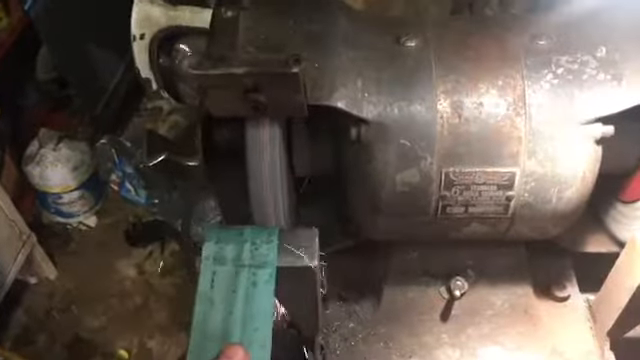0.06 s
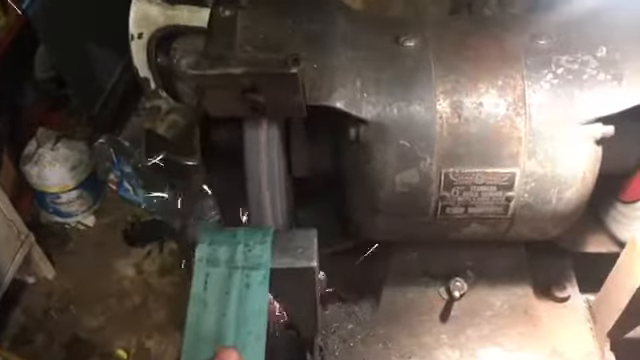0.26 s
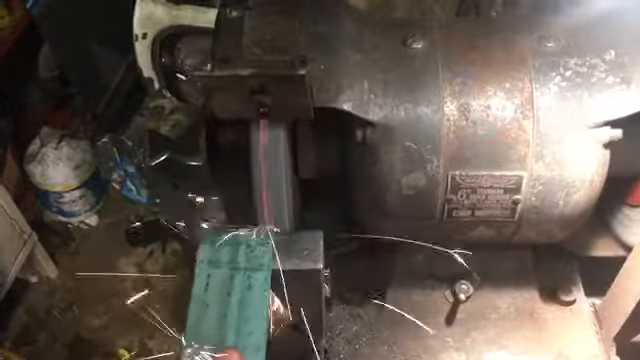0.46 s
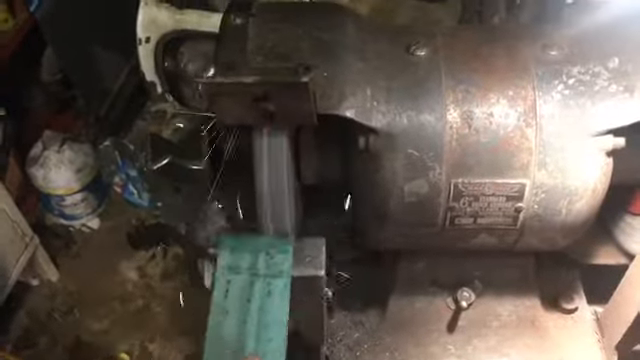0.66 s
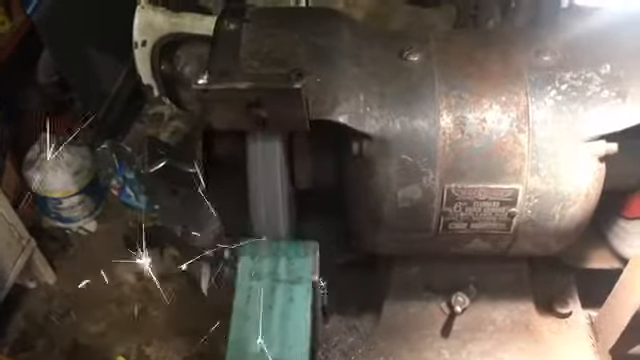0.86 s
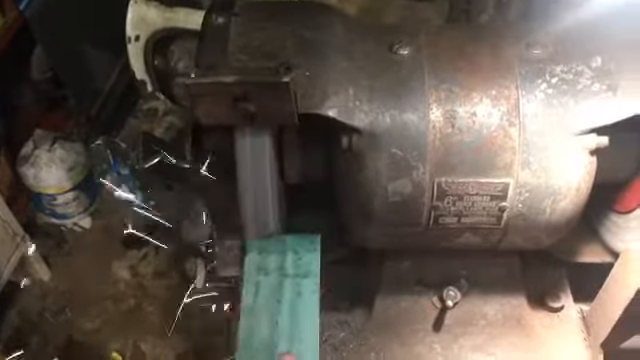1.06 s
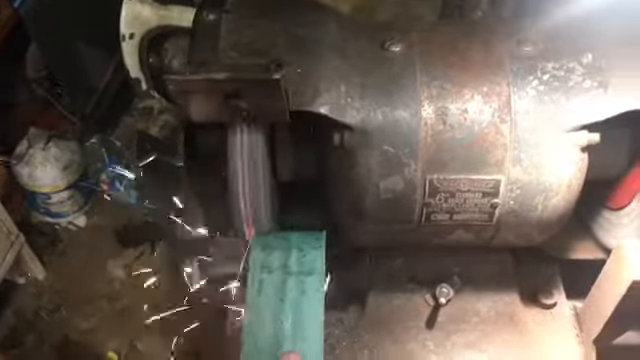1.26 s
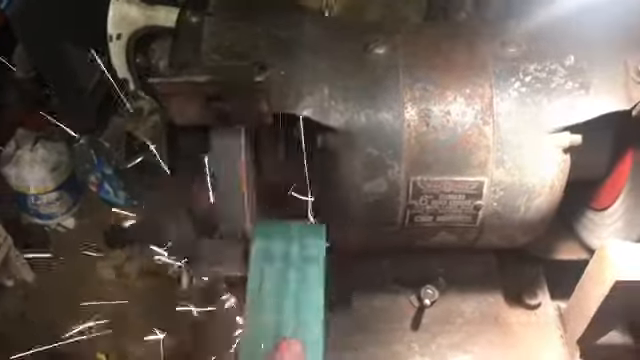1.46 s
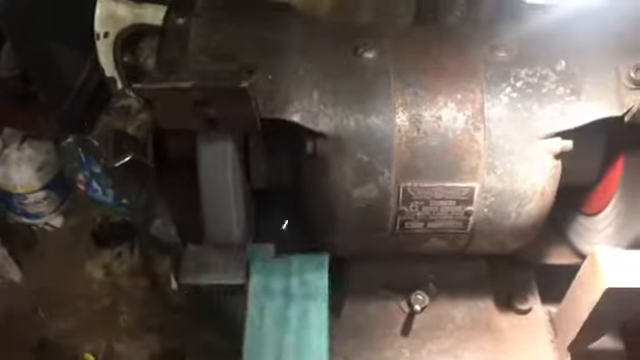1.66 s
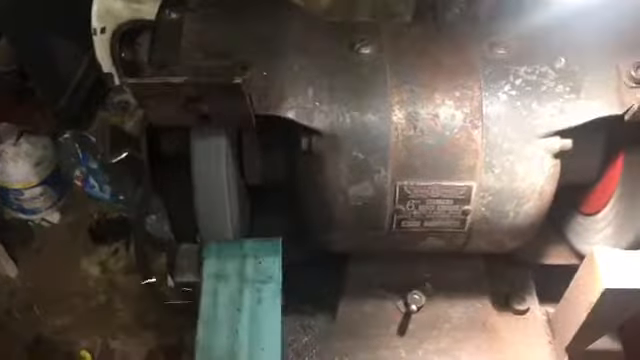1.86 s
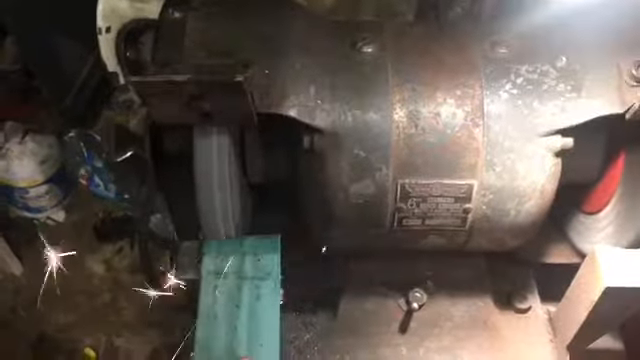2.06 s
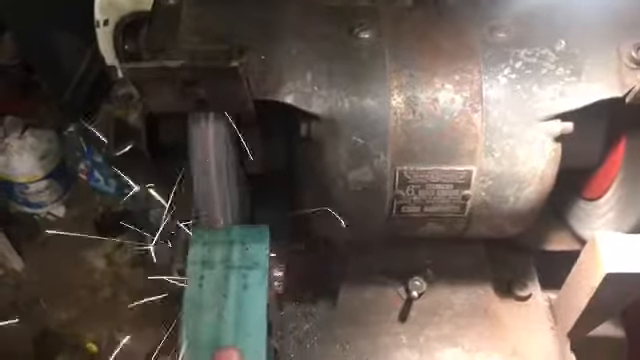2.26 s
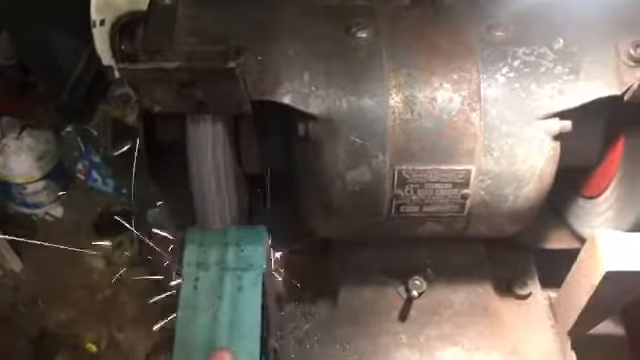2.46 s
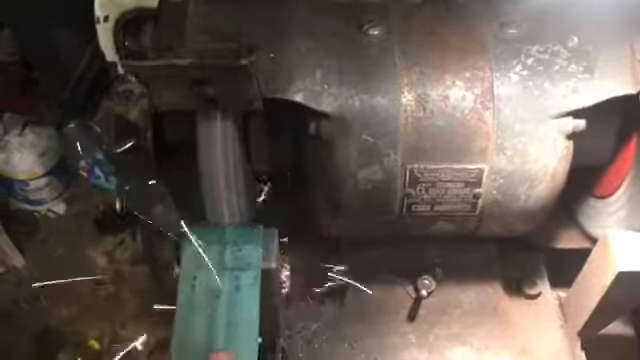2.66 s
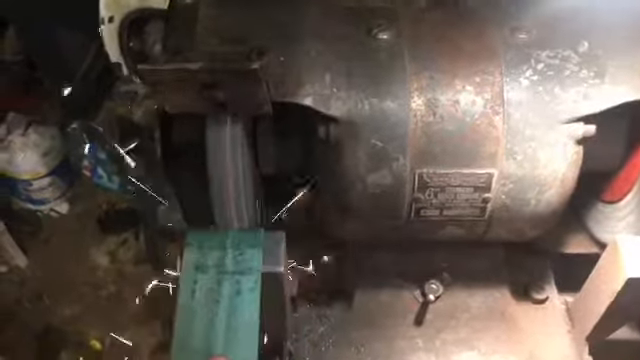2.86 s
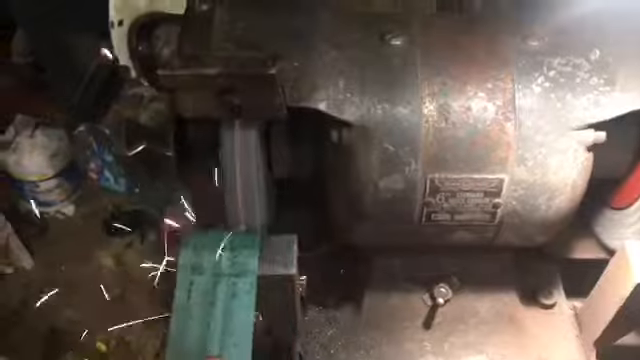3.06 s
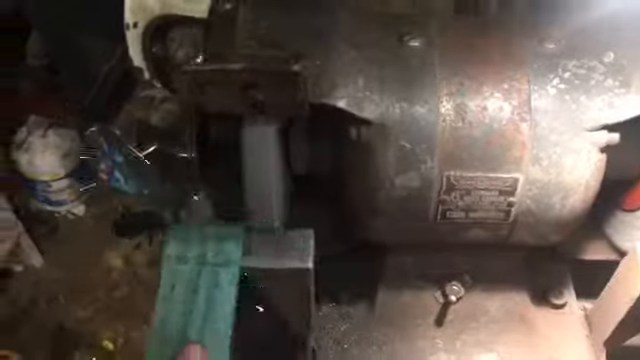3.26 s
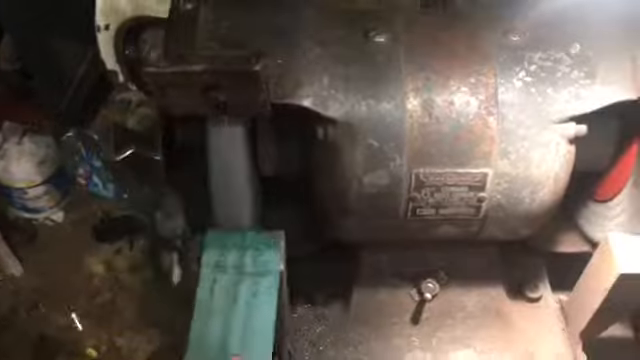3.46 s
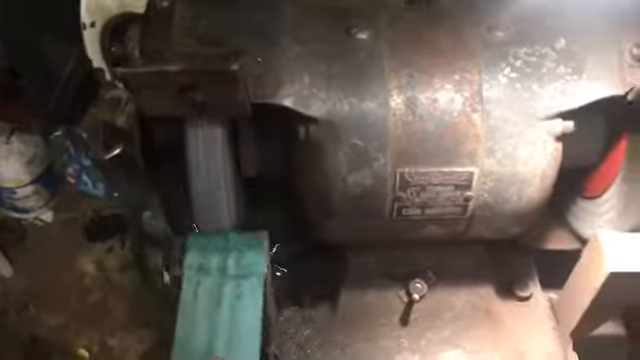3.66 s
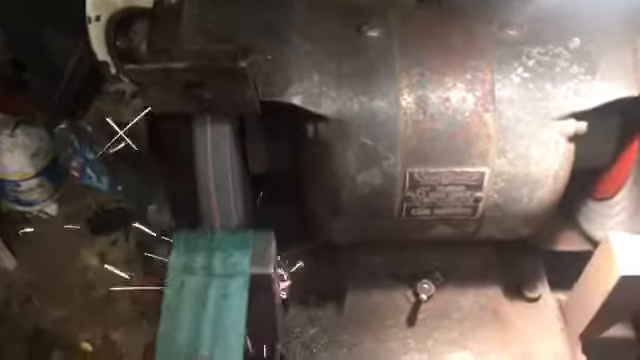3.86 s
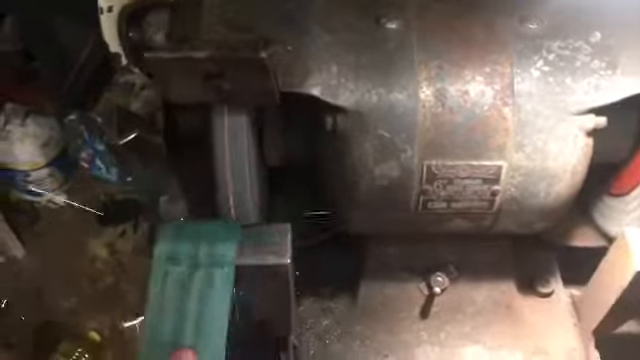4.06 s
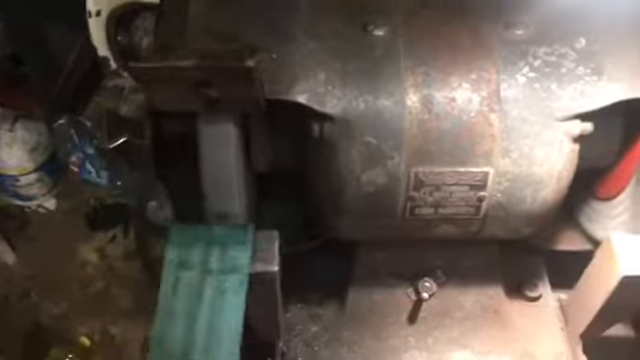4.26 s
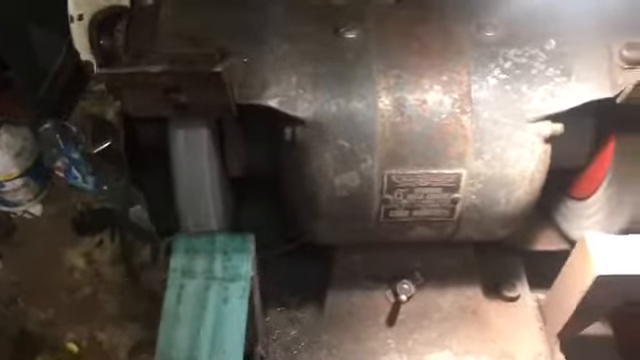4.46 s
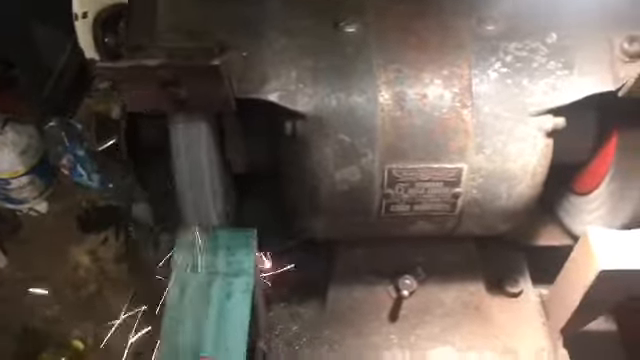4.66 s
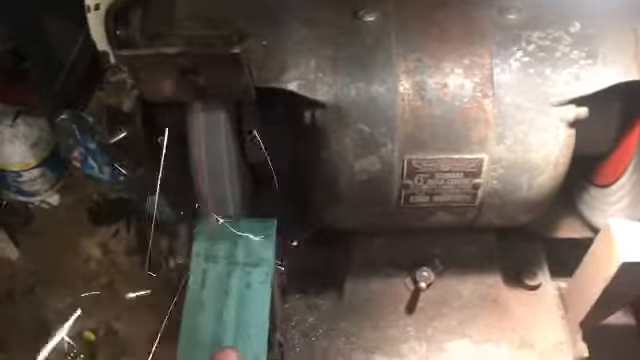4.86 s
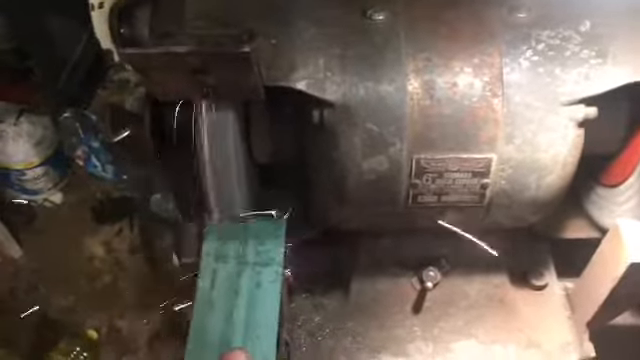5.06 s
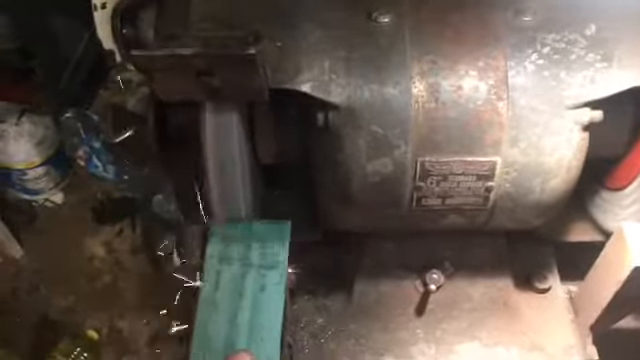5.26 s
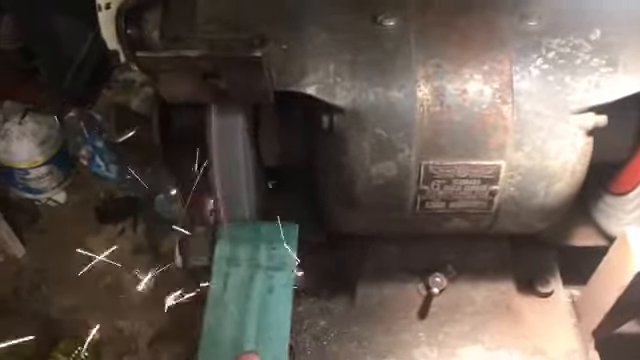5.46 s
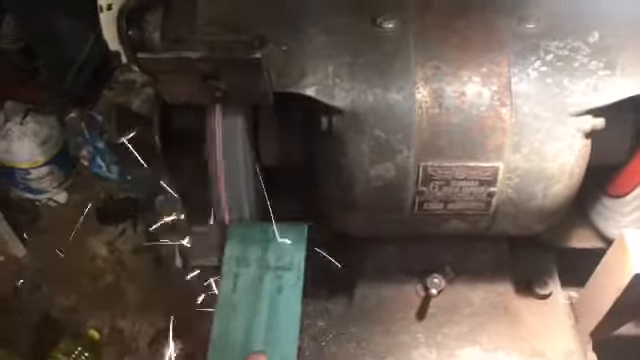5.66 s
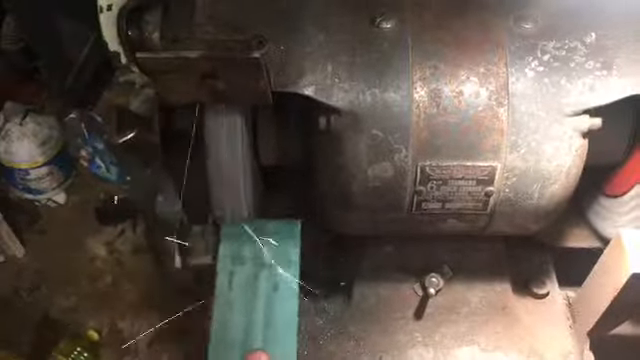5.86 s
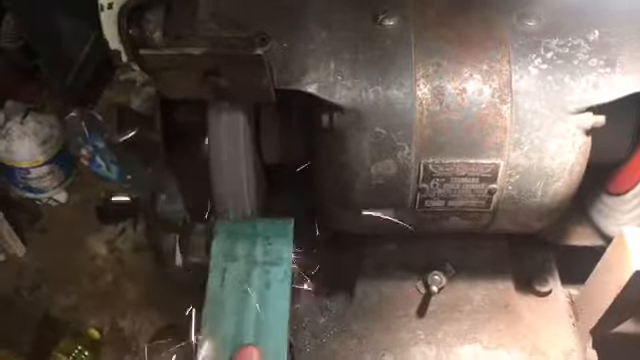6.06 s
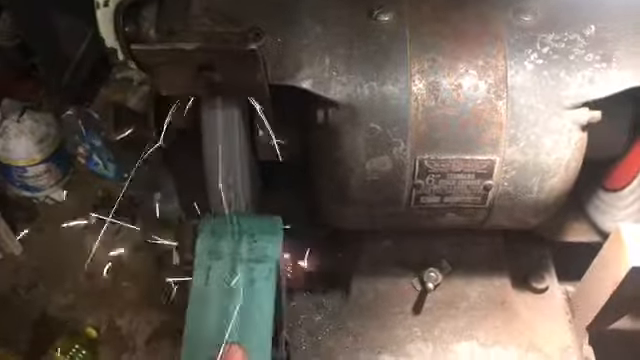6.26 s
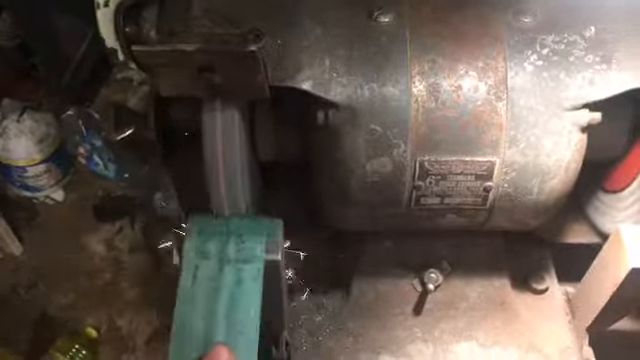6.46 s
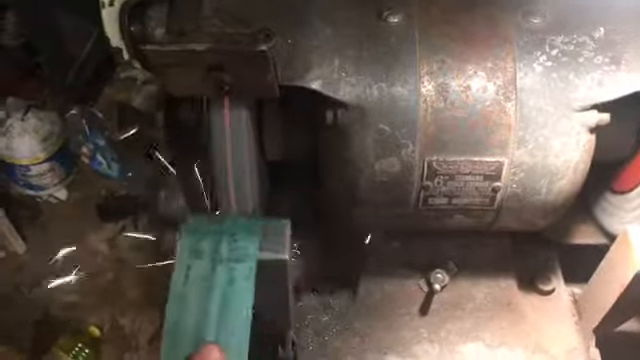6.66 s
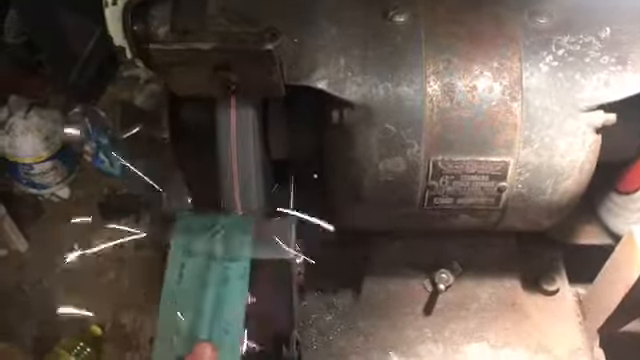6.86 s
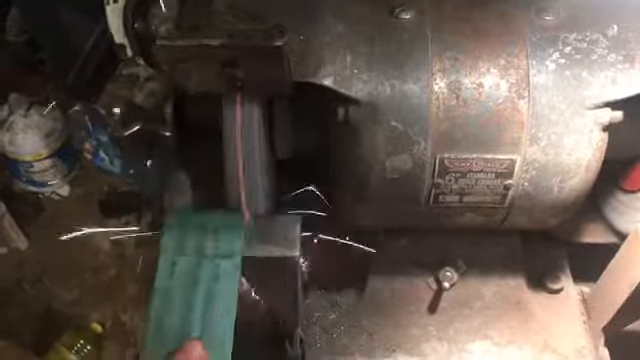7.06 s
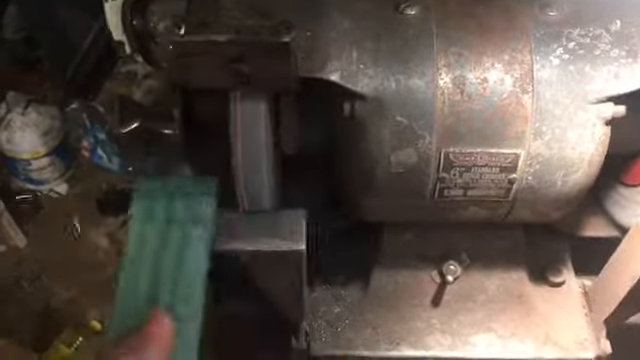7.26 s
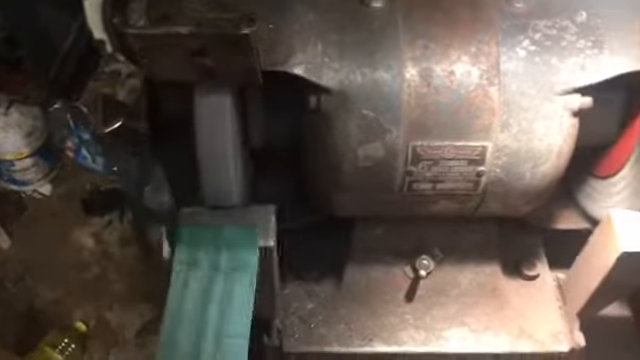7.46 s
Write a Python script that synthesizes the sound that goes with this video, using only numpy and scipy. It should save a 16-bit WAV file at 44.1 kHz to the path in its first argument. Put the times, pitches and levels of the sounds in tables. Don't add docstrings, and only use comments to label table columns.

```python
import sys
import numpy as np
from scipy import signal
from scipy.fft import rfft, irfft, next_fast_len
from scipy.io import wavfile
from scipy.ndimage import uniform_filter1d, map_coordinates

SR = 44100
rng = np.random.default_rng(int(sys.argv[2]) if len(sys.argv) > 2 else 0)


def wav_out(sig):
    wavfile.write(sys.argv[1], SR, np.round(np.clip(np.atleast_2d(sig).T, -1, 1) * 32767).astype(np.int16))


def voltage_ratio(level):
    return 10 ** (np.asarray(level, float) / 20)


N = 331305

# (time [s], speed [turns/s])
WHEEL_SPEED = [(0.0, 57.8), (0.72, 58.35), (1.11, 57.1), (1.4, 58.8), (1.65, 59.7), (2.32, 57.5),
               (2.82, 57.4), (3.16, 58.2), (3.53, 59.4), (3.8, 57.5), (4.0, 57.7), (4.37, 59.7),
               (4.64, 58.1), (5.52, 58.5), (5.81, 59.0), (6.15, 58.2), (7.07, 57.7), (7.22, 59.5)]
# (time [s], likeness of the grit from one turn to the next [0-1])
STILLNESS = [(0.1, 0.8), (0.6, 0.62), (0.8, 0.41), (1.0, 0.61), (1.25, 0.25), (1.7, 0.17), (2.2, 0.82),
             (2.8, 0.67), (3.4, 0.13), (3.8, 0.36), (4.2, 0.18), (4.6, 0.38), (4.8, 0.68), (5.5, 0.3),
             (5.8, 0.33), (6.0, 0.49), (6.35, 0.2), (6.9, 0.33)]
# (touch [s], clear [s], bite level [dB], hum level [dB])
CONTACTS = [
    (-.3, 1.52, -20, -48),
    (1.754, 3.215, -17.5, -47),
    (3.434, 4.08, -18, -43),
    (4.352, 7.16, -17.5, -44.5),
    (7.498, 7.97, -17, -42),
]
# (time [s], pressure [dB], ringing [dB], lean to the low ring [dB])
HAND_PRESSURE = [
    [(0, -22, 2, -0.5), (.38, -23, 2.5, -3), (.74, -23, 2, 1), (1.0, -19.5, -1.5, 1),
     (1.244, -22.5, -1, -.5), (1.425, -31.5, -5.5, -.5), (1.446, -25.5, -7, 1), (1.465, -28, -7, -3)],
    [(1.8, -22.5, 1, .5), (1.956, -17.5, 1, 2), (2.2, -20.5, 1, 0.5), (2.86, -21.5, 2, 2.5),
     (2.92, -24.5, 1, 2.5), (3.09, -22.5, -.5, -1), (3.175, -32, 2, -2)],
    [(3.46, -23, -2, -1), (3.56, -19.5, -.5, -.5), (3.868, -17.5, 0, 2.5), (3.98, -26, 0, -1),
     (4.02, -26.5, 1, 0)],
    [(4.38, -23, 0, -1), (4.55, -19, -1, 1.5), (5.17, -22, -1, -2), (5.63, -20.5, -1, -1.5),
     (5.77, -25, .5, .5), (5.85, -20.5, -1.5, 0), (6.2, -22, -2.5, -.5), (6.55, -20, 0, 1.5),
     (7.1, -24, -1, 0)],
    [(7.51, -16, 3, -3)],
]
# (time [s], low ring [Hz], high ring [Hz], narrow share of low [0-1], narrow share of high [0-1])
RINGS = [(0, 1380, 2230, .3, .2), (.42, 1340, 2260, .35, .15), (.5, 1320, 2120, .5, .6),
         (.72, 1300, 2080, .5, .4), (.95, 1310, 2200, .15, .2), (1.85, 1365, 2220, .5, 0.35),
         (2.4, 1310, 2115, .65, 0), (2.85, 1330, 2100, .55, 0), (3.05, 1280, 2180, .2, 0),
         (3.5, 1353, 2230, 0.27, 0.4), (3.85, 1290, 2090, 0.27, 0), (4.4, 1327, 2194, 0.17, 0.47),
         (4.7, 1310, 2200, .2, .55), (5.6, 1400, 2220, 0.11, .6), (6.2, 1390, 2230, .05, .2),
         (6.6, 1340, 2110, .25, 0), (7.1, 1320, 2260, .2, 0.04), (7.5, 1450, 2150, .2, 0)]
# (frequency [Hz], level [dB per Hz])
SCRAPE_SPECTRUM = [(1530, -101), (2600, -5), (2860, -3), (3490, 1), (4540, -6), (4860, -10), (5200, -7.5),
                   (5820, -25.5), (6400, -43), (8320, -87), (14100, -120)]
# (frequency [Hz], level [dB per Hz])
FIZZ_SPECTRUM = [(3530, -25.5), (6000, -15), (7180, -8.5), (7940, -12.5), (9500, -11.5), (10600, -18.5),
                 (11900, -12), (15600, -23)]
# (start [s], end [s], centre [Hz], lift, negative
# where dimmed [dB])
PLATE_MODES = [ (0, .6, 7350, 11), (0, 0.395, 8520, 7.5), (0.406, 0.655, 8110, 10), (.5, 0.882, 5310, 9),
               (.85, 1.397, 6700, 0.5), (0.853, 1.403, 9600, 6), (1.352, 1.804, 5460, 15),
               (1.803, 2.038, 3520, 5), (1.75, 1.95, 9600, 12), (2.198, 2.62, 5350, 13), (2.55, 3, 5200, 6),
               (2.88, 3.496, 4470, 8.5), (2.903, 3.653, 7300, 8), (3.35, 3.59, 9500, 14),
               (3.7, 4.598, 4430, 3), (3.9, 4.703, 7400, 10), (4.4, 5.6, 9240, 1), (4.7, 6.2, 6830, 3.5),
               (4.294, 4.897, 8900, 8.5), (4.9, 5.9, 11300, 4), (5.8, 6.7, 12300, 6), (6.1, 7, 8700, 5),
               (6.705, 7.2, 7300, 5), (6.802, 7.2, 12120, 7.5), (6.797, 7.6, 4500, 7.5),
               (4.6, 7.2, 10500, -5), (1.9, 2.9, 14300, -3.5), (2.9, 4.8, 13800, -6), (5.8, 7.2, 13500, -5)]
# (frequency [Hz], level [dB per Hz])
HOUSING_SPECTRUM = [(140, -55), (240, -19), (286, -3.5), (375, -6), (464, 0.5), (560, -3), (622, -0.5),
                    (740, -5.5), (960, -19), (1630, -120)]
# (start [s], end [s], centre [Hz], lift [dB])
HOUSING_MODES = [
    (.85, 1.2, 530, 1.9),
    (2.1, 2.452, 720, 9.8),
    (2.4, 2.752, 667, 10.2),
]
SHAFT_ORDERS = (1, 5, 8, 9, 11)
SHAFT_DB = (-25.5, -10, -9.5, -6.5, -17.5)
# (frequency [Hz], level [dB per Hz])
WINDAGE_SPECTRUM = [(540, -48), (920, -14), (1210, 3.5), (1570, -0.5), (1960, 4), (2400, -0.5), (2620, -11),
                    (2830, 0), (4830, -6), (7310, -6.5), (8430, 1), (10400, -10), (11300, -8), (15600, -17)]
# (frequency [Hz], level [dB rms])
BEARING_WHINE = [
    (1427, -75),
    (2030, -73),
    (2896, -73),
    (3354, -76),
]
# (frequency [Hz], level [dB per Hz])
BENCH_SPECTRUM = [(18, -43), (30, -28), (50, -2), (91, -3.5), (166, 4.5), (250, 3.5), (320, -16),
                  (550, -120)]
# (time [s], peak level [dB], frequency [Hz])
BUMPS = [
    (.974, -41, 80),
    (1.165, -40.5, 80),
]

GRAZE_S, GRAZE_DB, RISE_S, BRUSH_DB = 0.087, -64, 0.03, -44.5
CLEAR_DB, BITE_RING_DB = -68.5, -3.5
LOW_DB, HIGH_DB, FIZZ_DB, FIZZ_FOLLOW = -2.0, -1.8, -1.1, -0.35
TREMOR_DB, WANDER_HZ = 0.55, 16
STEADY = 0.8
PATCH_DB = 2.0
PLATE_WIDTH, HOUSING_WIDTH = 0.029, 0.063
JUMP_DB, SETTLE_S, SAG_DB = 7, 0.17, -1
IDLE_DB, LIFT_DB_PER_S = -50, 33.5
BENCH_DB, BENCH_IDLE_DB, BENCH_SETTLE_DB, BENCH_LIFT, RUMBLE_DB = -17, -61.5, 4, 0.7, 2
HUM_GRIT, IDLE_DULL = 0.55, 0.5
EDGE_HZ = 15750


def plate(grit, turns):
    press_db, ring_db, lean_db = hand()
    low_hz, high_hz, low_free, high_free = curves(RINGS)
    shake, sway, low_slip, high_slip = drift(11, count=4)
    low_hz = low_hz + WANDER_HZ * low_slip
    high_hz = high_hz + WANDER_HZ * high_slip
    low_db = LOW_DB + ring_db + lean_db + TREMOR_DB * sway
    high_db = HIGH_DB + ring_db - lean_db - TREMOR_DB * sway

    throb = sum(depth * np.cos(2 * np.pi * (order * turns + rng.random()))
                for order, depth in ((1, 0.055), (3, 0.037), (4, 0.051)))
    grit = grit * (1 + throb)
    later_grit = np.roll(grit, 310)

    low = evened(resonate(ring(grit, low_hz, 480, 125, low_free), 1380, 720))
    high = evened(ring(grit, high_hz, 620, 140, high_free))
    valley = evened(resonate(resonate(later_grit, 1740, 330), 1740, 330))
    tool_rest = evened(resonate(resonate(later_grit, 790, 150), 790, 150))
    high = high + voltage_ratio(-14.5) * valley + voltage_ratio(-28.0) * tool_rest

    scrape = colour(grit, SCRAPE_SPECTRUM)
    fizz = voltage_ratio(FIZZ_DB + FIZZ_FOLLOW * ring_db) * colour(grit, FIZZ_SPECTRUM)
    hiss = patchy(scrape + fizz, PATCH_DB, 2, 55, PLATE_MODES, PLATE_WIDTH)

    whole = np.sqrt(1 + voltage_ratio(2 * low_db) + voltage_ratio(2 * high_db))
    layers = voltage_ratio(low_db) * low + voltage_ratio(high_db) * high + hiss
    return voltage_ratio(press_db + TREMOR_DB * shake) / whole * layers


def hand():
    rows = []
    for (touch, clear, bite_db, _), press in zip(CONTACTS, HAND_PRESSURE):
        rows += [(touch - GRAZE_S, GRAZE_DB, 0, 0),
                 (touch - RISE_S, BRUSH_DB, 0, 0),
                 (touch, bite_db, BITE_RING_DB, 0),
                 *press,
                 (clear, CLEAR_DB, BITE_RING_DB, 0),
                 (clear + 0.02, CLEAR_DB - 10, 0, 0)]
    return curves(rows)


def ring(grit, hz, wide, narrow, free):
    hump = evened(resonate(resonate(grit, hz, wide), hz, wide))
    mode = evened(resonate(resonate(grit, hz, narrow), hz, narrow))
    free = np.clip(free, 0, 1)
    both = (1 - free) * hump + free * mode
    slow_power = uniform_filter1d(uniform_filter1d(both ** 2, 3000), 3000)
    return both / (slow_power + 0.01) ** (STEADY / 2)


def rim(turns, still):
    steps, orders = 1900, 300
    at = np.searchsorted(turns, np.arange(steps) / 4).clip(0, N - 1)
    wear = (0.22 + (np.arange(orders) / 80) ** 1.3) / 4
    fresh = rng.standard_normal((steps, orders, 2)) @ [1, 1j]
    track = np.zeros((steps, 1025), complex)
    track[0, :orders] = fresh[0]
    for k in range(1, steps):
        keep = np.clip(still[at[k]], 0.05, 0.98) ** wear
        track[k, :orders] = keep * track[k - 1, :orders] + np.sqrt(1 - keep ** 2) * fresh[k]
    track /= (abs(track) + 0.1) ** 0.15
    surface = irfft(track, axis=1)
    position = [4 * turns, turns % 1 * 2048]
    profile = evened(map_coordinates(surface, position, order=1, mode="grid-wrap"))
    repeat = np.clip(still ** 0.5 * 1.1, 0, 0.97)
    chips = 0.85 * rng.standard_normal(N)
    return np.sqrt(repeat) * profile + np.sqrt(1 - repeat) * chips


def motor(grit, turns):
    level_db, bass_db, load = lifted()
    *waver, rumble = drift(5, count=6)
    shaft = sum(voltage_ratio(db + 1.5 * w) * np.cos(2 * np.pi * (order * turns + rng.random()))
                for order, db, w in zip(SHAFT_ORDERS, SHAFT_DB, waver))
    housing_noise, air_noise, bench_noise = rng.standard_normal((N, 3)).T

    housing = colour(HUM_GRIT * load * grit + 0.5 * housing_noise, HOUSING_SPECTRUM)
    housing = patchy(housing + 1.2 * load * shaft, 0.52, 2, 40, HOUSING_MODES, HOUSING_WIDTH)
    housing = housing - IDLE_DULL * (1 - load) * resonate(housing, 720, 300)

    air = voltage_ratio(-7.5) * colour(air_noise, WINDAGE_SPECTRUM)
    whine = sum(voltage_ratio(db + 54) * evened(resonate(air_noise, hz, 11)) for hz, db in BEARING_WHINE)
    bench = colour(bench_noise + 0.27 * grit, BENCH_SPECTRUM)
    return voltage_ratio(level_db) * (housing + air + 0.67 * whine) + voltage_ratio(bass_db + RUMBLE_DB * rumble) * bench


def lifted():
    rows, idle_from = [], -1
    for touch, clear, _, hum_db in CONTACTS:
        lift_db = LIFT_DB_PER_S * (touch - idle_from)
        bench_db = hum_db + BENCH_DB
        rows += [(touch - 0.05, IDLE_DB + lift_db, BENCH_IDLE_DB + BENCH_LIFT * lift_db, 0),
                 (touch, hum_db + JUMP_DB, bench_db + JUMP_DB, 0.3),
                 (touch + SETTLE_S, hum_db, bench_db + BENCH_SETTLE_DB, 1),
                 (clear - 0.15, hum_db + SAG_DB, bench_db + SAG_DB, 1),
                 (clear + 0.03, IDLE_DB, BENCH_IDLE_DB, 0)]
        idle_from = clear + 0.03
    return curves(rows)


def bumps():
    t = np.arange(N) / SR
    total = np.zeros(N)
    for start, db, hz in BUMPS:
        since = t - start
        push = np.sin(2 * np.pi * hz * since)
        knock = 0.45 * np.sin(2 * np.pi * 2.7 * hz * since)
        total += voltage_ratio(db) * (push + knock) * (since > 0) * np.exp(-abs(since) / 0.009)
    return total


def resonate(x, hz, width):
    turn = np.exp(2j * np.pi * np.cumsum(hz * np.ones(N)) / SR)
    r = np.exp(-np.pi * width / SR)
    return 2 * (turn * signal.lfilter([1 - r], [1, -r], x / turn)).real


def patchy(x, patch_db, bins, frames, modes=(), share=0):
    hz, s, z = signal.stft(x, SR, nperseg=1024, noverlap=768)
    field = rng.standard_normal(z.shape[::-1]).T
    for _ in range(2):
        field = uniform_filter1d(uniform_filter1d(field, bins, 0), frames, 1)
    field = patch_db * evened(field)
    for start, end, centre_hz, db in modes:
        during = np.exp(-((2 * s - start - end) / (end - start)) ** 4)
        band = np.exp(-((hz - centre_hz) / (share * centre_hz)) ** 2)
        field += db * np.outer(band, during)
    return evened(signal.istft(z * voltage_ratio(field), nperseg=1024, noverlap=768)[1][:N])


def colour(x, points):
    f, db = np.transpose(points)
    size = next_fast_len(N)
    hz = np.fft.rfftfreq(size, 1 / SR)
    gain = voltage_ratio(np.interp(np.log(hz + 1), np.log(f), db, -90))
    return evened(irfft(rfft(x, size) * gain, size)[:N])


def drift(per_s, count):
    values = rng.standard_normal((200, count))
    return [np.interp(np.arange(N) / SR * per_s, np.arange(200), v) for v in values.T]


def curves(rows):
    s, *columns = np.transpose(rows)
    return [np.interp(np.arange(N) / SR, s, c) for c in columns]


def evened(x):
    return x / np.sqrt(np.mean(x ** 2) + 1e-20)


def scene():
    turns = np.cumsum(curves(WHEEL_SPEED)[0]) / SR
    grit = rim(turns, curves(STILLNESS)[0])
    mono = plate(grit, turns) + motor(grit, turns) + bumps()
    return np.array([mono, mono])


def roll_off(x):
    return signal.sosfilt(signal.butter(12, 17100, fs=SR, output="sos"), x)


def record(dry):
    edge = signal.firwin(1023, EDGE_HZ, window=("kaiser", 10), fs=SR)
    mix = signal.oaconvolve(dry, edge[None], "same")
    return roll_off(mix)


dry = scene()
out = record(dry)
wav_out(out)
```